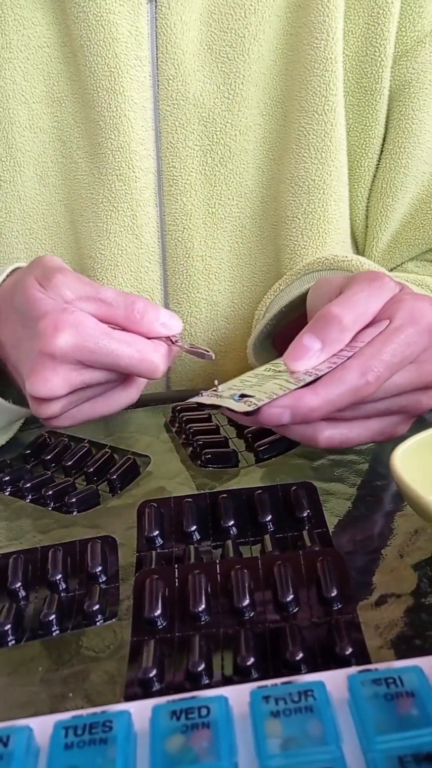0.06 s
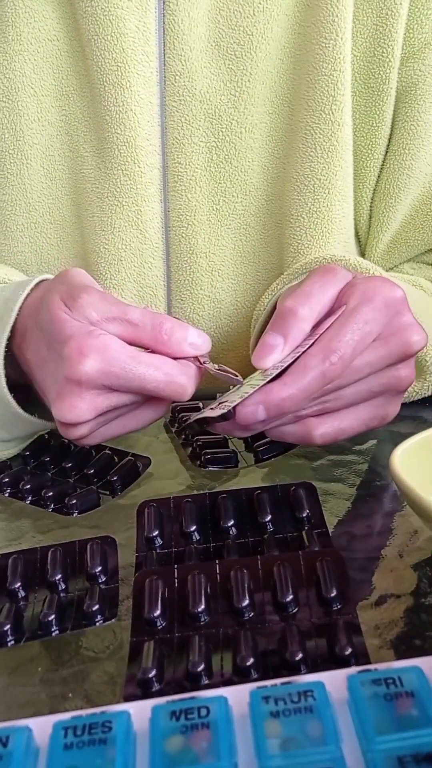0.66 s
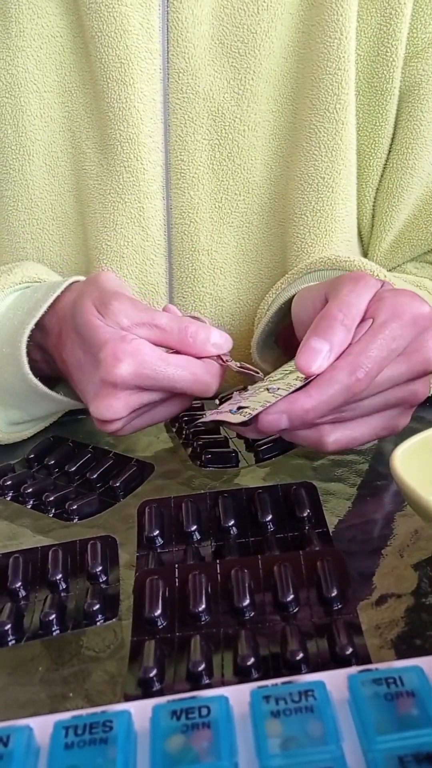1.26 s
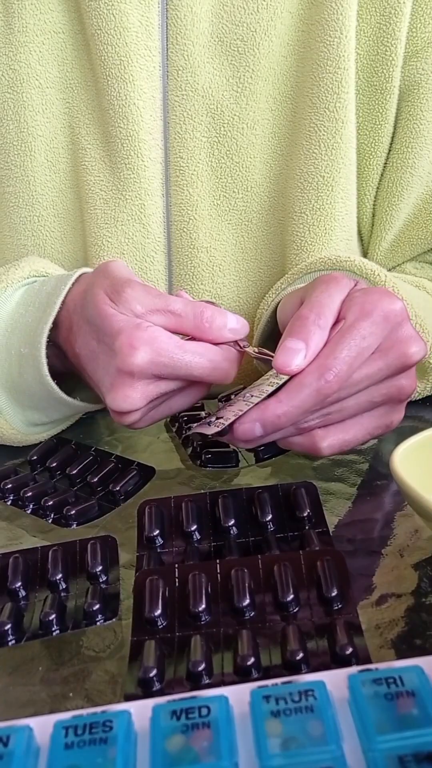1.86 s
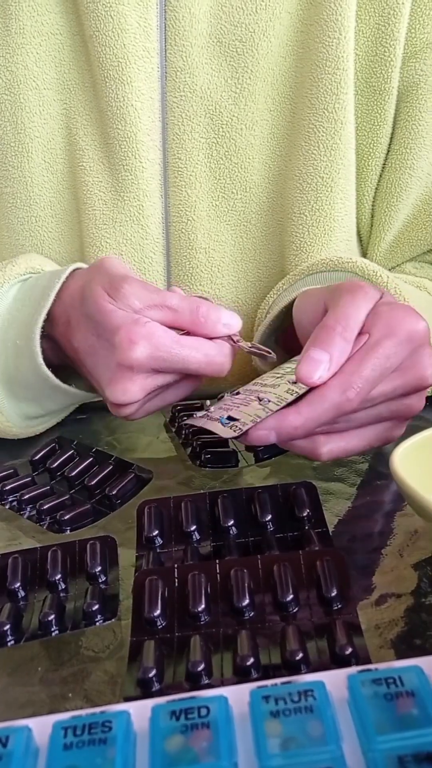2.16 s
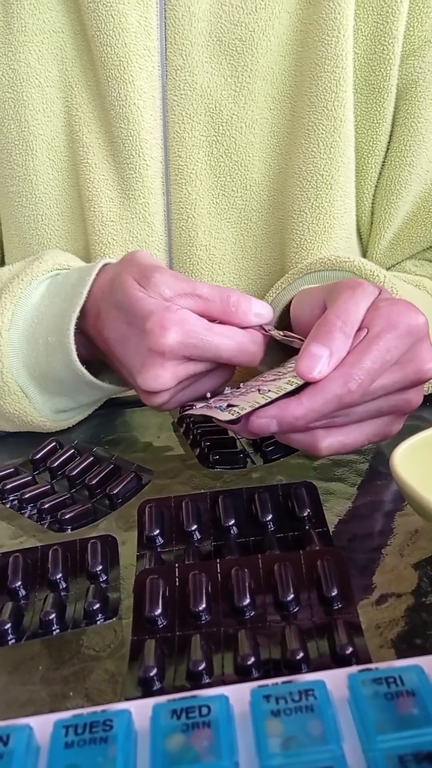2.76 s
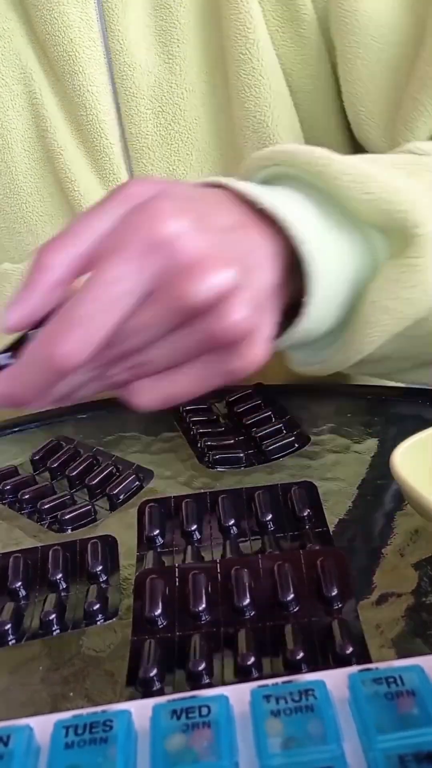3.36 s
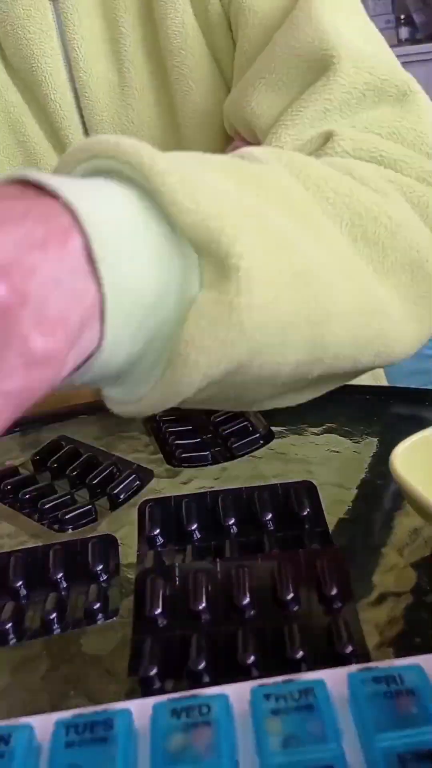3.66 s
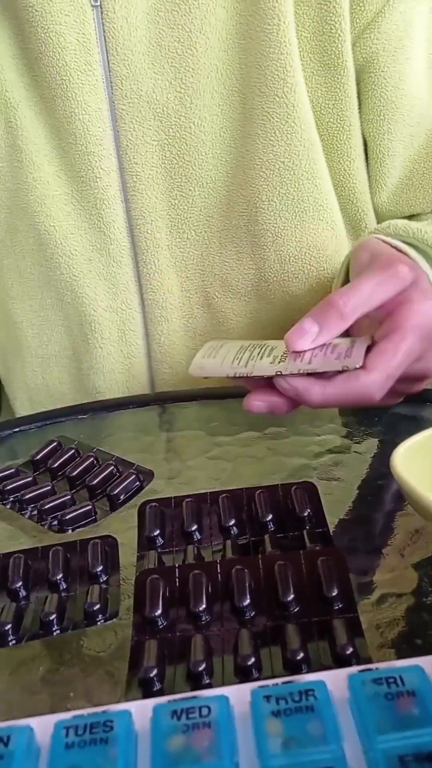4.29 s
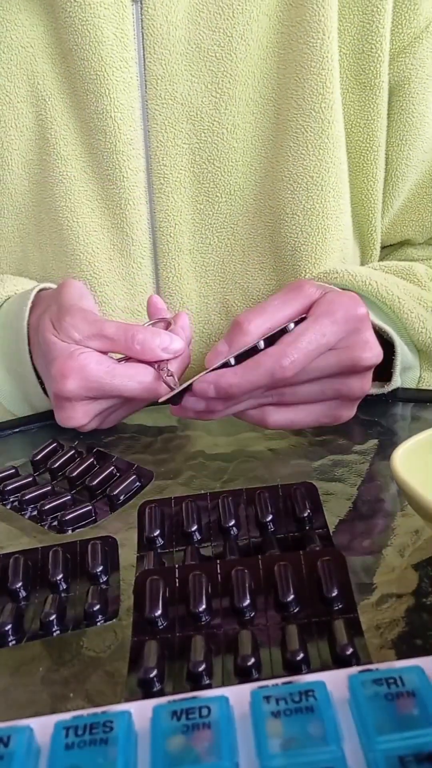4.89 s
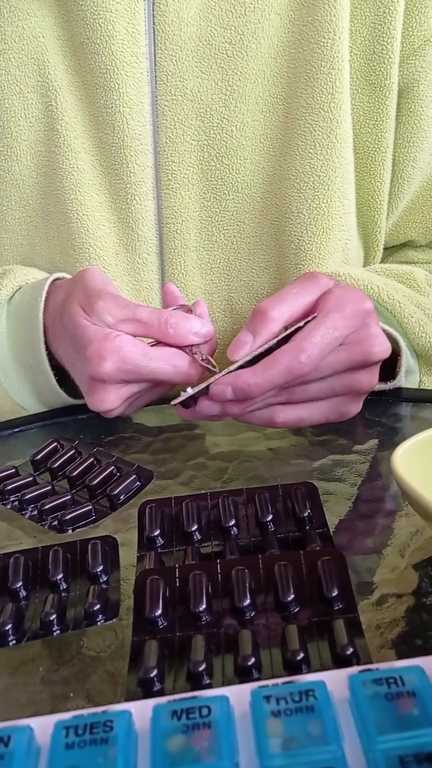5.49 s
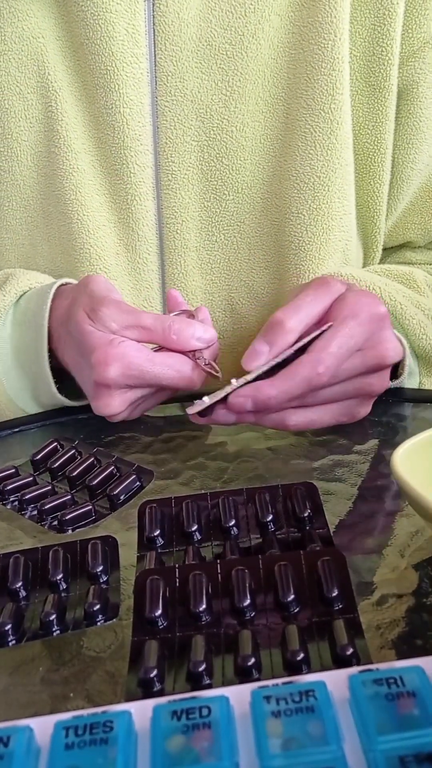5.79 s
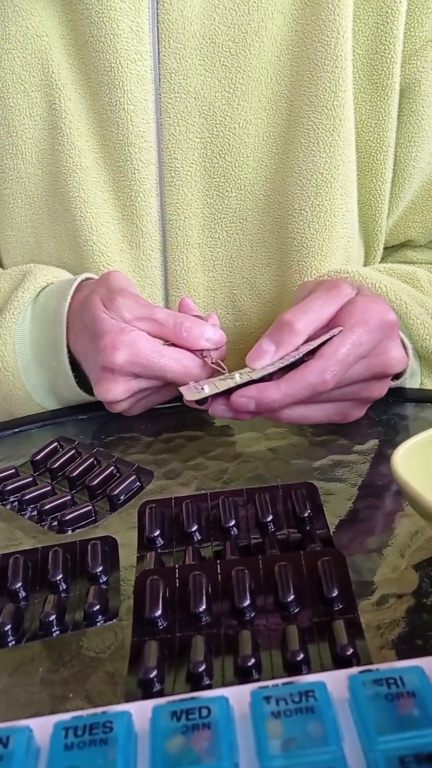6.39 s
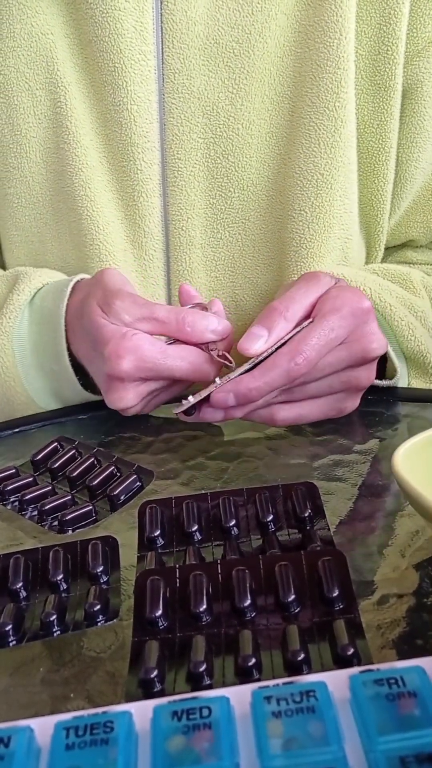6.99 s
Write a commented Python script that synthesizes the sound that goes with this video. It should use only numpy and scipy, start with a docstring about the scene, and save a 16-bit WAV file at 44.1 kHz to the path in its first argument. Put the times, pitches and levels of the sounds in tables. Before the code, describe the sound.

Metal tweezers pick at the foil of a plastic blister pack, close to the microphone in a quiet furnished room. From the start, short scrapes mix with small, sharp, irregular snaps, each wrapped in a brief crinkle, with soft thuds from hands and sleeves. The loudest snap comes at about 3.1 seconds. Scraping and a dull bump follow around 3.7 seconds, and at 4.3 the pack knocks once on a glass table with a very short ring. After a lull, the picking resumes at 5 seconds, with clusters of snaps and scrapes around 5.5, 6.5 and 7 seconds. Tiny, very high squeaks from the tweezers accompany a few snaps, near 0.5, 2.1, 3.1 and 5.5 seconds. Faint rumble and hiss lie behind everything, with a faint low hum in the first half second.

```python
"""Tweezers on a blister pack

A glass table in a quiet, furnished room, the microphone close to the hands. Steel tweezers scrape the
foil of a plastic pack in short strokes, now and then squeaking; blisters buckle with sharp snaps, each
wrapped in a brief crinkle. Scrapes nudge the pack against the fingers, hands and sleeves bump softly,
and once the pack knocks on the glass. Faint rumble, hiss and a brief hum lie behind."""
import sys
import numpy as np
from scipy import signal
from scipy.fft import rfft, irfft, next_fast_len
from scipy.io import wavfile

SR = 44100
rng = np.random.default_rng(int(sys.argv[2]) if len(sys.argv) > 2 else 0)


def to_wav(sig):
    """Store sig (one row per channel, or 1-D mono) as 16-bit WAV at the path in sys.argv[1].

    Samples outside -1..1 are clipped; the rate is SR.
    """
    pcm = np.clip(np.atleast_2d(sig), -1, 1) * 32767
    pcm = np.round(pcm).astype(np.int16)
    wavfile.write(sys.argv[1], SR, pcm.T)  # frames by channels


N = 319284
TIME = np.arange(N) / SR

# A blister buckles or the foil cracks. Body and top are gains at 1 and 14.5 kHz against 6 kHz;
# ring is the resonance of the patch that is touched.
# (time [s], level [dB], body [dB], top [dB], ring [Hz], ring gain [dB])
SNAPS = [(0.0466, -27, -16.5, -1.5, 2700, 0), (0.074, -31, -6, 3, 2700, -4.5),
         (.248, -40, -4, -8, 2320, 14), (.5235, -24, -9, -2, 4900, 21), (0.5868, -30.5, -1.5, 2, 4730, 10),
         (0.6072, -30.5, -1, -3, 4670, 9.5), (0.7088, -36.5, -23, 6, 4500, 6),
         (.7301, -34.5, 10.5, -8, 1460, 7), (0.8557, -29.5, -13, 12, 7170, 12),
         (1.005, -41, -21, 4, 4430, 2), (1.0396, -44, -0.5, -2, 1850, 7.5),
         (1.212, -40.5, -12, 2, 2870, 23), (1.2419, -34, -6, 11.5, 7400, 2), (1.4173, -48, 3, -8, 4700, 12),
         (1.4768, -34, -9, -21, 4370, 15), (1.4807, -25, -25, -16.5, 4570, 11),
         (1.561, -51, 14, -8, 10000, 9), (1.614, -34.5, -4, -8, 2740, 4.5), (1.651, -38.5, -4, 8, 2900, -1),
         (1.6772, -32, -6, -15, 5200, 13), (1.6799, -30.5, -3.5, 3, 10200, 12.5),
         (1.9489, -41.5, 18.5, -17, 2630, 10), (2.0354, -26, 2.5, 9.5, 8400, 6),
         (2.0814, -26, -21, 6.5, 3900, 11.5), (2.1177, -32, -5, 9, 4190, 14),
         (2.3466, -37.5, -7.5, 7, 1500, 11.5), (2.4637, -37, 16, 3, 2560, 4),
         (2.55, -32.5, -18, 7, 4300, 8), (2.6766, -44.5, -12, -1, 7550, 7), (2.782, -32, -2, 5, 2810, 7),
         (2.854, -35, -13, 9.5, 9350, 17), (2.9441, -36.5, 17.5, -9, 2300, 15.5),
         (2.9813, -35.5, -5, 3, 5380, 14.5), (3.1284, -14.3, -22, -16, 3050, 21),
         (4.0519, -41, 4.5, -12, 2740, 9), (4.2501, -21, 9, -13.5, 3350, 25),
         (4.252, -20, 11, -3, 2300, 26), (4.3275, -42, 9, -3, 2050, 9.5), (4.9941, -28.5, 1, -5, 2650, 4.5),
         (5.0558, -32, -2, 9, 10070, 6.5), (5.1419, -43.5, -7, -1, 4580, 8),
         (5.3038, -42.5, -3.5, 17, 2634, 6), (5.3465, -30.5, -21, -3.5, 1230, 18.5),
         (5.4163, -32, -8, 4.5, 4570, 9.5), (5.449, -22.5, -6.5, 2, 8000, 9.5),
         (5.5126, -32, 1.5, 10, 7850, 9), (5.5985, -30.5, 4, -10, 2760, 18),
         (5.6813, -30.5, 22, -8, 1115, 6), (5.8819, -42.5, -24.5, 4.5, 4260, 9),
         (5.99, -61, 6, 0, 4500, 10), (6.142, -34.5, 12, -10, 4510, 5), (6.3664, -37, -15, 2, 3510, 9.5),
         (6.408, -34.5, -7.5, 7, 2920, 9), (6.472, -42, -31, -16, 3700, 8),
         (6.5409, -20.5, -18, -12, 7400, 3), (6.5407, -24, -21, -7, 2920, 14),
         (6.8215, -37, 5, -8, 2900, 0), (6.9017, -28.5, 0, -15, 2820, -4.5), (6.9614, -32, -9, 10, 7200, 7),
         (6.9857, -37.5, 17, -5, 1410, 14), (7.1481, -39.5, 0, 26, 2880, 5), (7.183, -40, 9, -7, 2850, 9),
         (7.191, -34, 15, -4, 2880, 0), (7.2213, -37.5, 2, 3, 2900, 16)]
# Strokes of the tip over foil and plastic:
# (time of peak [s], fall [s], level [dB], body [dB], top [dB], ring [Hz])
SCRAPES = [(0, .011, -46, -4, 1, 6900), (.071, 0.025, -41.5, 7.5, 3, 2370),
           (.29, 0.086, -53.5, 5, -2, 2620), (.338, 0.017, -41, 12, 8, 7900),
           (.519, 0.021, -35, -7.5, 2.5, 4870), (.85, .016, -36.5, -8, 0, 4220),
           (.948, .021, -43, 2.5, 1, 8830), (1.154, 0.031, -58, 8, 2, 8030),
           (1.212, 0.017, -40.5, -12, 6, 2870), (1.259, 0.017, -42, -6, -1, 2750),
           (1.362, 0.021, -53, 1.5, -10, 4230), (1.44, 0.02, -45.5, 8.5, 3, 4730),
           (1.514, 0.037, -52, 9.5, -12, 5880), (1.785, 0.021, -37, -2.5, -2.5, 7200),
           (1.97, 0.025, -54.5, 19, -16, 2720), (2.027, 0.014, -42, 2, 4, 8200),
           (2.125, 0.02, -34, 12, 2.5, 10000), (2.195, 0.017, -50.5, 3, 7, 3670),
           (2.307, 0.018, -54, -9, 15, 4770), (2.389, 0.02, -45.5, 2, 4, 1550),
           (2.471, .017, -40, 10.5, 3, 2580), (2.721, .016, -48, -4.5, -8, 7350),
           (2.793, 0.02, -30.5, 0.5, -1, 2900), (3.088, 0.032, -38.5, -13.5, -3, 2990),
           (3.341, 0.029, -52.5, 10, -6, 3760), (3.425, 0.019, -48, -12, 5, 4100),
           (3.473, .031, -54.5, 1, 2, 4360), (3.617, .014, -46.5, -7.5, -0.5, 1910),
           (3.644, 0.044, -42, -3, 2.5, 3980), (3.709, .022, -30.5, 3.5, 2, 2050),
           (3.803, 0.01, -63, 7, 2, 3980), (3.972, 0.057, -45.5, 4, 3, 3560),
           (4.088, 0.041, -53, 7, -10, 5740), (4.143, 0.016, -48.5, 4, -1.5, 2610),
           (4.221, .052, -39, 11, -6, 5390), (4.392, 0.036, -66, 16.5, 6, 1818),
           (5.36, 0.018, -43.5, 4, 1, 4850), (5.687, 0.014, -40, 11, -3.5, 2750),
           (5.729, 0.018, -42, 6, 1, 8510), (5.808, 0.0089, -53, 1, -9, 1350),
           (6.098, 0.026, -47.5, 14.5, 2.5, 4410), (6.163, 0.018, -39.5, 6.5, 2.5, 6820),
           (6.228, 0.021, -64, 5, 5, 3870), (6.359, 0.012, -47, -6.5, 2, 4080),
           (6.415, .015, -37.5, 0, -9, 2860), (6.521, 0.035, -34.5, -1, 3, 2850),
           (6.818, 0.026, -40, -1, -1, 2470), (6.91, 0.035, -44.5, 6, -2, 4550),
           (6.962, 0.011, -35.5, -6, -8, 3260), (6.988, .018, -39, 7, -9, 4110),
           (7.158, 0.016, -46, 1, 20, 2750), (7.219, 0.024, -49, 11.5, -2, 2780)]


def from_db(db):
    """Decibels to gain."""
    return 10 ** (np.asarray(db) / 20)


def rms_one(x):
    """Scale to an rms of 1."""
    return x / np.sqrt(np.mean(x ** 2) + 1e-20)


def bins(size):
    """Frequencies of an FFT, kept above zero."""
    return np.maximum(np.fft.rfftfreq(size, 1 / SR), 1)


def at_hz(spectrum, hz):
    """Read (frequency [Hz], level [dB]) points on a log-frequency axis."""
    points_hz, points_db = np.transpose(spectrum)
    return np.interp(np.log(hz), np.log(points_hz), points_db)


def radiate(x, gain_db):
    """Causal (minimum-phase) filter with the given gain in each FFT bin."""
    cepstrum = irfft(gain_db * np.log(10) / 20)
    cepstrum[1:len(x) // 2] *= 2
    cepstrum[len(x) // 2 + 1:] = 0
    return irfft(rfft(x) * np.exp(rfft(cepstrum)))


def add(out, sound, s):
    """Mix a sound in, starting at time s."""
    start = int(round(s * SR))
    first, last = max(start, 0), min(start + len(sound), N)
    out[first:last] += sound[first - start:last - start]


def swell(t, rise_s, fall_s):
    """Pressure builds and lets go exponentially around a rounded top at t = 0."""
    from_top = t / np.where(t < 0, max(rise_s, .002), max(fall_s, .002))
    return np.exp(2 - 2 * np.sqrt(1 + from_top ** 2))


def steady_noise(spectrum):
    """Noise with the given spectrum and an rms of 1."""
    size = 2 * next_fast_len(N // 2 + 1)
    white = rfft(rng.standard_normal(size))
    return rms_one(irfft(white * from_db(at_hz(spectrum, bins(size))))[:N])


def pack_response(hz):
    """How the pack radiates, with the resonances that every touch shares, in dB."""
    # Broad response of the sheet: (frequency [Hz], gain [dB])
    radiation = [(150, -33), (400, -11.5), (750, -9.5), (1250, -1), (1600, -5), (2700, -5.5), (3500, -4),
                 (4800, 0.5), (6600, 1), (8500, -6), (11000, -14), (13500, -20.5), (15200, -13.5),
                 (16500, -28.5)]
    # Its resonances: (centre [Hz], half-width [Hz], gain [dB])
    modes = [(760, 38, 1.5), (1000, 42, 3), (1324, 120, 3), (1790, 70, 0), (1947, 70, 5.5), (2473, 70, 0.5),
             (2620, 130, 7), (2870, 130, 5.5), (3340, 90, 1), (3770, 130, 0.5), (4200, 480, 3.5),
             (5940, 40, 1), (6710, 250, 3.5), (7600, 150, 1.5), (15050, 300, 2.5)]
    return at_hz(radiation, hz) + sum(db / (1 + ((hz - centre) / width) ** 2) for centre, width, db in modes)


def spot_colour(hz, colour, ripple_db, ripple_hz):
    """What one spot of the pack adds, in dB: a broad tilt, a damped ring and random ripple from the grip."""
    body_db, top_db, ring_hz, ring_db = colour
    # Where the body, mid, 0 dB and top gains sit: (frequency [Hz])
    anchors_hz = [1000, 2700, 6000, 14500]
    mid_db = -5 + .41 * body_db
    tilt = np.interp(np.log(hz), np.log(anchors_hz), [body_db, mid_db, 0, top_db])
    width_hz = max(.053 * ring_hz, 450)
    ring = ring_db / (1 + ((hz - ring_hz) / width_hz) ** 2)
    grip = np.interp(hz / ripple_hz, np.arange(256), rng.standard_normal(256))
    return tilt + ring + ripple_db * grip


def background():
    """A low rumble and a faint, dull hiss that sink in the pauses."""
    # Course of the two noises: (time [s], rumble [dB], hiss [dB])
    levels = [(0, -63.5, -59.5), (.5, -63.5, -72), (1.2, -66.5, -68), (2.2, -69, -78.5), (3.4, -73, -73.5),
              (3.9, -86.5, -99), (4.101, -75.5, -75), (4.55, -84.5, -90), (5.2, -69, -78.5),
              (6, -81, -88.5), (6.4, -77, -71.5), (6.85, -65, -66), (7.1, -93, -98), (7.24, -86, -89.5)]
    # Shape of the rumble: (frequency [Hz], relative density [dB])
    rumble_spectrum = [(20, -25), (50, -6), (90, -4.5), (125, 2), (200, -6), (320, -7), (500, -27.5),
                       (1000, -39.5)]
    # Shape of the hiss: (frequency [Hz], relative density [dB])
    hiss_spectrum = [(150, -22), (400, 2), (560, -1.5), (720, 0.5), (1000, -11.5), (1320, -1), (1600, -7),
                     (2000, -4), (2400, -11), (3000, -6.5), (4200, -21.5), (8000, -27), (16000, -37)]
    s, rumble_db, hiss_db = np.transpose(levels)
    rumble = from_db(np.interp(TIME, s, rumble_db)) * steady_noise(rumble_spectrum)
    hiss = from_db(np.interp(TIME, s, hiss_db)) * steady_noise(hiss_spectrum)
    return rumble + hiss


def hum(pitch_hz=124.6, waver_share=.03):
    """A low, wavering tone that fades within the first second."""
    # Fade of the hum: (time [s], level [dB])
    levels = [(0, -62), (.35, -59), (.45, -76), (.8, -120)]
    waver = steady_noise([(1, 0), (12, 0), (40, -40)])
    phase = 2 * np.pi * np.cumsum(pitch_hz * (1 + waver_share * waver)) / SR
    return from_db(np.interp(TIME, *np.transpose(levels))) * np.sqrt(2) * np.sin(phase)


def microphone_noise(level_db=-82.5):
    """The microphone's own steady hiss, duller towards the top."""
    return from_db(level_db) * steady_noise([(100, 0), (3000, 1), (6500, -1), (10000, -7), (16000, -10)])


def rub_foil(strokes, grains_per_s=5000, grain_spread_db=2, slips_per_s=280, slip_db=2.5, size=12288):
    """Stick and slip: dense grains over smooth rubbing, clumped by the slips, sound through the pack."""
    out, t, hz = np.zeros(N), np.arange(size) / SR, bins(size)
    lead_s = t[size // 3]
    pack = pack_response(hz)
    for s, rise_s, fall_s, db, colour in strokes:
        sizes = from_db(grain_spread_db * np.minimum(rng.exponential(1, size), 4))
        signs = rng.choice([-1, 1], size)
        grains = rms_one(sizes * signs * (rng.random(size) < grains_per_s / SR))
        slips = from_db(slip_db * np.interp(t * slips_per_s, np.arange(512), rng.standard_normal(512)))
        rubbing = .31 * rng.standard_normal(size)
        pressure = swell(t - lead_s, rise_s, fall_s)
        force = (grains + rubbing) * slips * pressure
        stroke = radiate(force, pack + spot_colour(hz, colour, ripple_db=2, ripple_hz=126.7))
        add(out, rms_one(stroke) * np.sqrt(np.mean(pressure ** 2)) * from_db(db), s - lead_s)
    return out


def scrapes(rise_s=.0085, ring_db=6):
    """The tip bites quickly and drags over the foil; the rubbed patch rings a little."""
    return rub_foil([(s, rise_s, fall_s, db, (body, top, ring_hz, ring_db))
                     for s, fall_s, db, body, top, ring_hz in SCRAPES])


def ticks(ticks_per_s=45, impulse_db=-52, spread_db=2, linger_s=.07, size=1024):
    """Around each scrape the creased foil settles in tiny random ticks."""
    worked = np.zeros(N)
    for s, *_ in SCRAPES:
        add(worked, np.hanning(int(2 * linger_s * SR)), s - linger_s)
    onsets = rng.random(N) < ticks_per_s * np.minimum(worked, 1) / SR
    sizes = from_db(impulse_db + spread_db * np.minimum(rng.exponential(1, N), 3))
    tick = radiate(signal.unit_impulse(size), pack_response(bins(size)))
    return signal.oaconvolve(onsets * sizes, tick)[:N]


def nudges(usual_thud_db=-67.5, follow_share=.26, size=16384):
    """Each scrape pushes the pack against the fingers with a soft thud, harder strokes more."""
    # Shape of the thud: (frequency [Hz], relative density [dB])
    spectrum = [(25, -19.5), (60, -2), (120, 1.5), (200, 0), (330, -9), (700, -23), (2000, -50.5)]
    power, t = np.zeros(N), (np.arange(size) - size // 3) / SR
    push = swell(t, rise_s=.016, fall_s=.054)
    usual_scrape_db = np.mean([db for _, _, db, *_ in SCRAPES])
    for s, _, db, *_ in SCRAPES:
        thud_db = usual_thud_db + follow_share * (db - usual_scrape_db)
        add(power, (from_db(thud_db) * push) ** 2, s + t[0])
    return np.sqrt(power) * steady_noise(spectrum)


def snaps(crack_s=.0025, sag_s=.0026, kick=4.8, spread_db=3, shiver_db=-19, shiver_s=.018, size=4096):
    """A buckle is a kick and a brief run of tiny fractures; then the sheet shivers, weaker and duller."""
    out, t, hz = np.zeros(N), np.arange(size) / SR, bins(size)
    crack = np.exp(-t / sag_s) / (1 + (t / crack_s) ** 12)
    shiver = from_db(shiver_db) * np.exp(-t / shiver_s)
    damping = signal.butter(2, 8000, fs=SR, output="sos")
    pack = pack_response(hz) + at_hz([(7000, -.034), (11000, -.96)], hz)   # slightly softer treble
    for s, db, *colour in SNAPS:
        fractures = rms_one(rng.standard_normal(size) * from_db(spread_db * rng.exponential(1, size)))
        force = fractures * crack + signal.sosfilt(damping, rng.standard_normal(size) * shiver)
        force[0] = kick * rng.choice([-1, 1])
        snap = radiate(force, pack + spot_colour(hz, colour, ripple_db=1.6, ripple_hz=302.6))
        strength = np.sqrt(np.sum(snap ** 2) / (crack_s * SR))
        add(out, snap * from_db(db) / strength, s)
    return out


def crinkles(below_snap_db=16, lag_s=.002, rise_s=.011, fall_s=.018, share=.65):
    """The foil crinkles around each snap and keeps a share of that snap's colour."""
    return rub_foil([
        (s + lag_s, rise_s, fall_s, db - below_snap_db, (share * body, share * top, hz, share * ring))
        for s, db, body, top, hz, ring in SNAPS])


def bumps(width_octaves=.61, lower_skirt_db=7, upper_skirt_db=11, size=16384):
    """Soft contacts give only a dull thud, whose bass reaches further than its treble."""
    # Hands, sleeves and pack meet the table: (time [s], fall [s], level [dB], centre [Hz])
    contacts = [(.06, 0.029, -51, 320), (.252, 0.058, -55.5, 200), (.336, 0.0096, -46.5, 394),
                (.99, 0.053, -60, 100), (1.48, 0.047, -53, 183), (2.172, 0.035, -54.5, 191),
                (2.82, .045, -53, 230), (2.965, .02, -59, 100), (3.144, 0.02, -43.5, 119),
                (3.708, 0.02, -35.5, 324), (3.995, 0.041, -53, 178), (4.26, .055, -52, 420),
                (5.176, 0.022, -50, 106), (5.456, 0.024, -47.5, 188), (6.455, 0.036, -58.5, 169),
                (6.566, 0.038, -40, 171), (6.971, 0.026, -59.5, 144)]
    out, t, hz = np.zeros(N), np.arange(size) / SR, bins(size)
    lead_s = t[size // 3]
    for s, fall_s, db, centre_hz in contacts:
        widths_away = np.log2(hz / centre_hz) / width_octaves
        skirt_db = np.where(widths_away < 0, lower_skirt_db, upper_skirt_db)
        band_db = -skirt_db * np.minimum(np.sqrt(1 + widths_away ** 2) - 1, 10)
        pressure = swell(t - lead_s, fall_s / 2, fall_s)
        thud = radiate(rng.standard_normal(size), band_db) * pressure
        add(out, rms_one(thud) * np.sqrt(np.mean(pressure ** 2)) * from_db(db), s - lead_s)
    return out


def squeaks(pitch_hz=15100, width_hz=900):
    """Friction drives a narrow, very high resonance of the tweezers."""
    # The steel tip skids: (time [s], rise [s], fall [s], level [dB])
    skids = [(.524, 0.011, 0.015, -54), (2.082, 0.002, .01, -50), (3.129, 0.0017, .008, -43.5),
             (5.413, 0.0091, .012, -48.5), (5.513, .009, 0.012, -44)]
    radius = np.exp(-np.pi * width_hz / SR)
    resonator = [1, -2 * radius * np.cos(2 * np.pi * pitch_hz / SR), radius ** 2]
    singing = signal.lfilter([1], np.convolve(resonator, resonator), rng.standard_normal(N))
    pressure = sum(from_db(db) * swell(TIME - s, rise_s, fall_s) for s, rise_s, fall_s, db in skids)
    return rms_one(singing) * pressure


def knock(start_s=4.2502):
    """The edge of the pack is stood on the glass table and rings briefly."""
    # Modes of pack against glass: (frequency [Hz], peak [dB], t60 [s])
    modes = [(1800, -29, 0.09), (1980, -31.5, 0.057), (2300, -28.5, 0.055), (2550, -27.5, .06),
             (3800, -32, .05)]
    t = np.maximum(TIME - start_s, 0)
    return sum((-1) ** k * from_db(db - 60 * np.minimum(t / t60, 3)) * np.sin(2 * np.pi * hz * t)
               for k, (hz, db, t60) in enumerate(modes))


def room(x, t60_s=.12, first_echo_s=.006, wall_hz=2500, send_db=-21, size=16384):
    """The furnished room returns a weak, dull tail to the microphone."""
    t = np.arange(size) / SR
    echoes = rng.standard_normal(size) * from_db(-60 * t / t60_s) * (t > first_echo_s)
    walls = signal.butter(2, wall_hz, fs=SR, output="sos")
    tail = signal.sosfilt(walls, echoes / np.linalg.norm(echoes))
    return signal.fftconvolve(from_db(send_db) * x, tail)[:N]


def scene():
    """Handling sounds close to one microphone, the room behind them."""
    handling = snaps() + scrapes() + crinkles() + ticks() + nudges() + bumps() + squeaks() + knock()
    return (handling + room(handling) + background() + hum() + microphone_noise())[None]


def record(dry):
    """The top is cut steeply above 16.3 kHz."""
    return signal.sosfilt(signal.ellip(10, .3, 80, 16300, fs=SR, output="sos"), dry)


dry = scene()
out = record(dry)
to_wav(out)
```